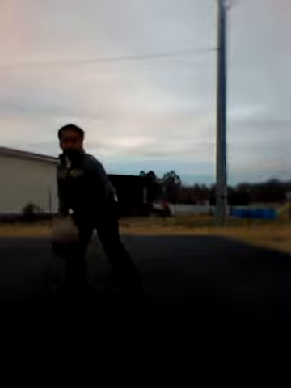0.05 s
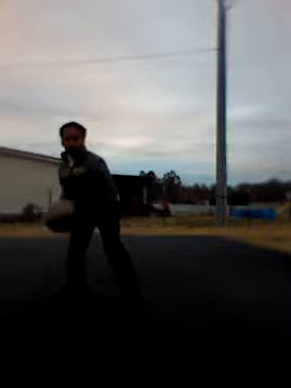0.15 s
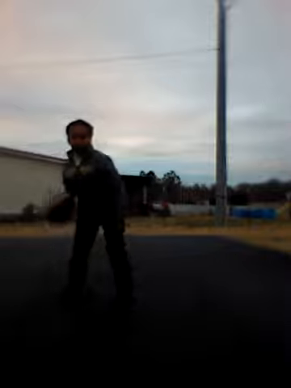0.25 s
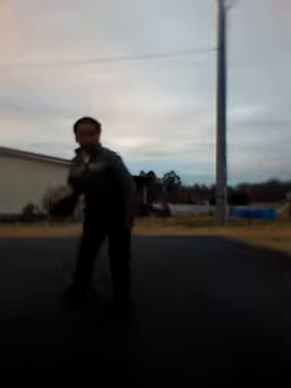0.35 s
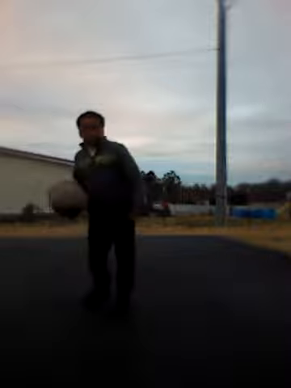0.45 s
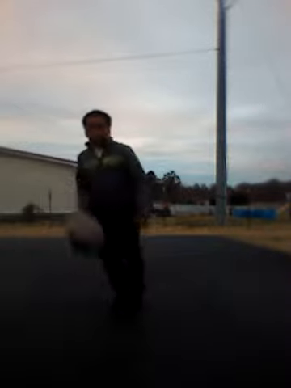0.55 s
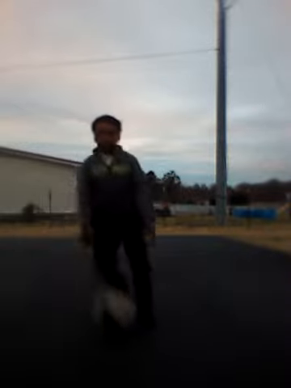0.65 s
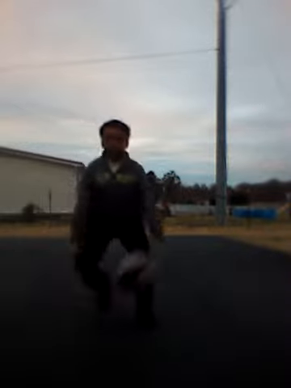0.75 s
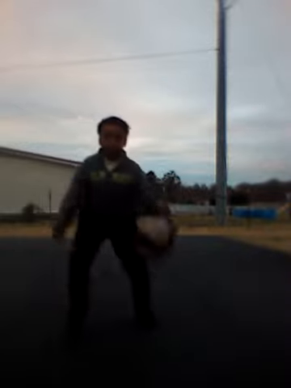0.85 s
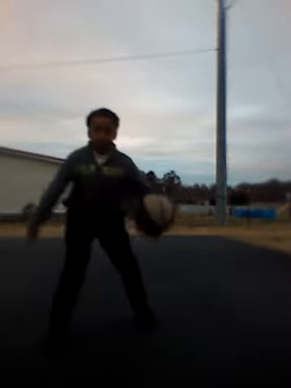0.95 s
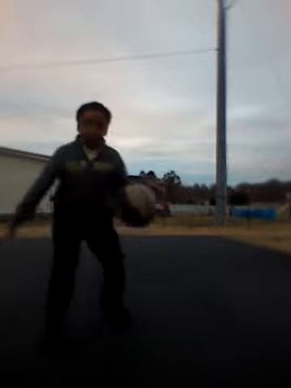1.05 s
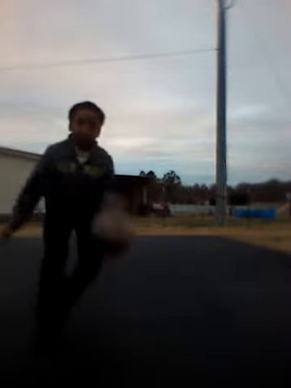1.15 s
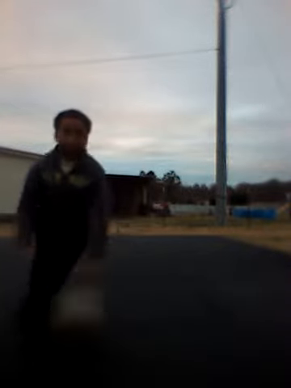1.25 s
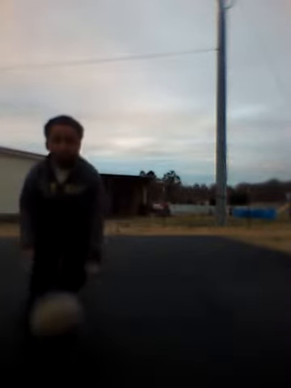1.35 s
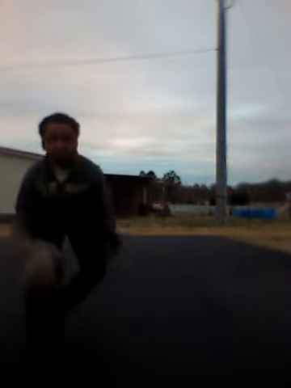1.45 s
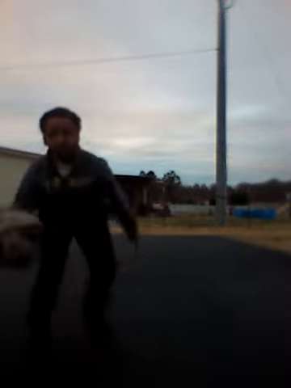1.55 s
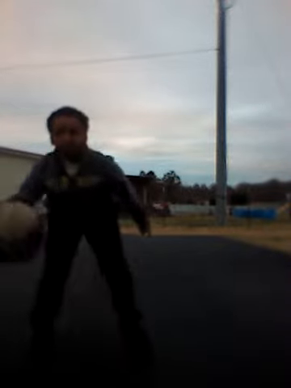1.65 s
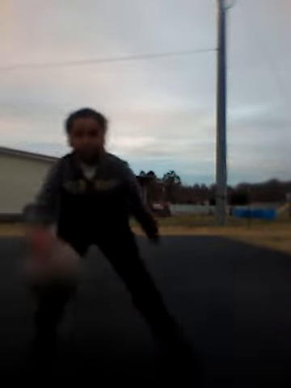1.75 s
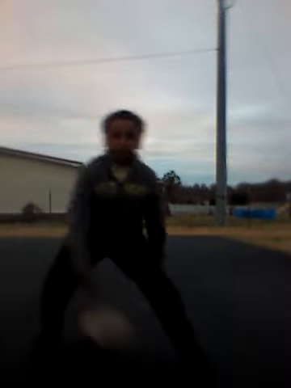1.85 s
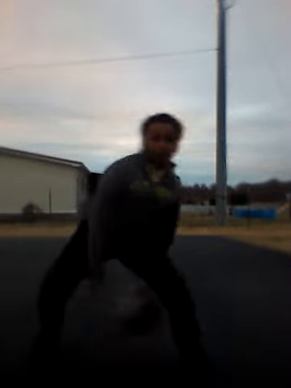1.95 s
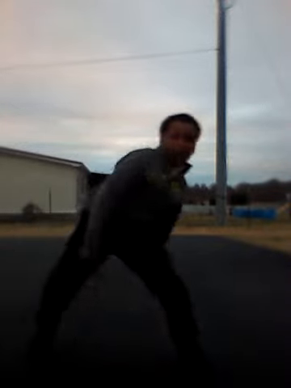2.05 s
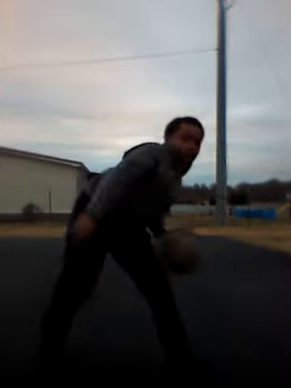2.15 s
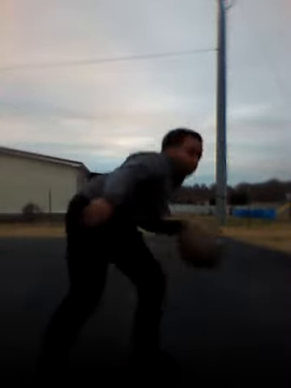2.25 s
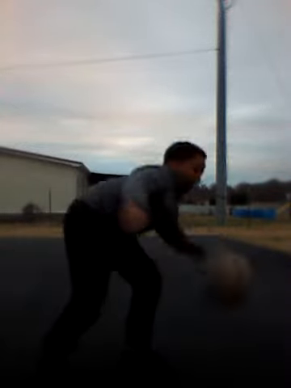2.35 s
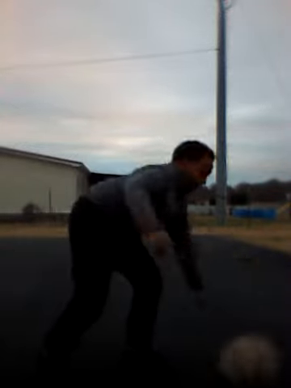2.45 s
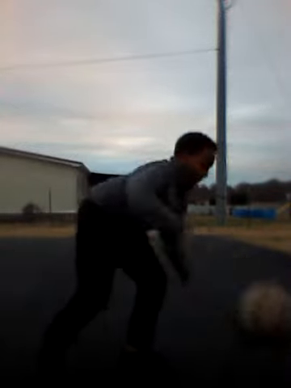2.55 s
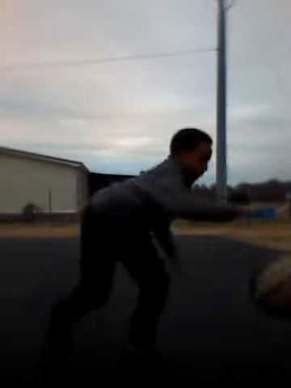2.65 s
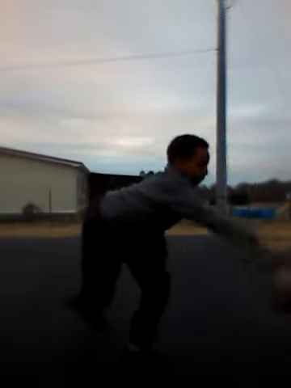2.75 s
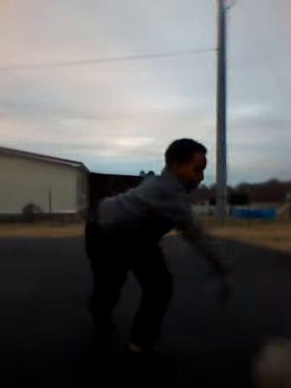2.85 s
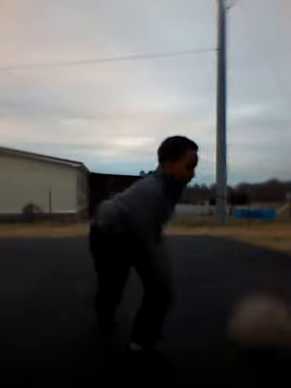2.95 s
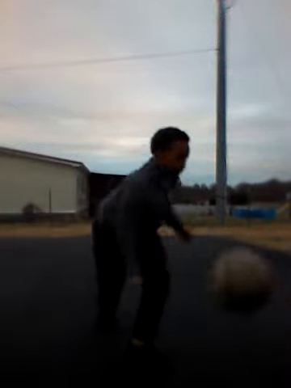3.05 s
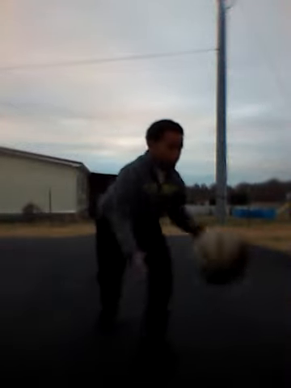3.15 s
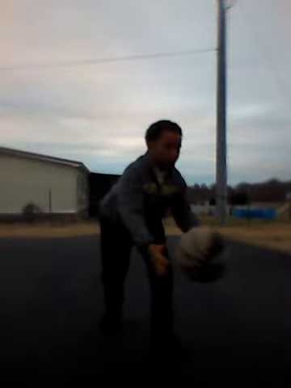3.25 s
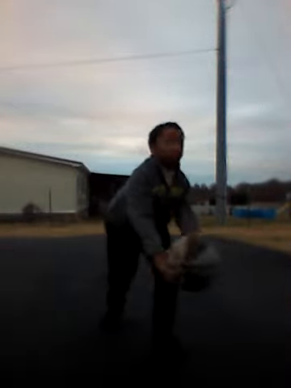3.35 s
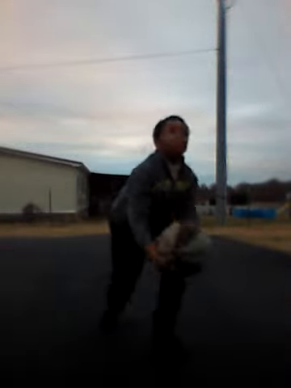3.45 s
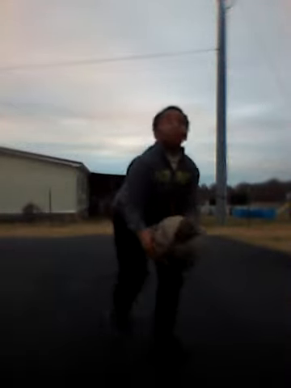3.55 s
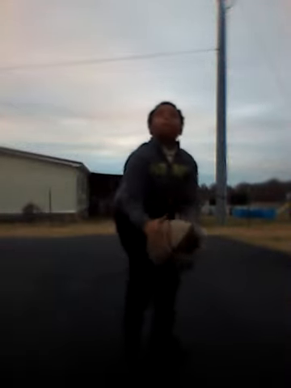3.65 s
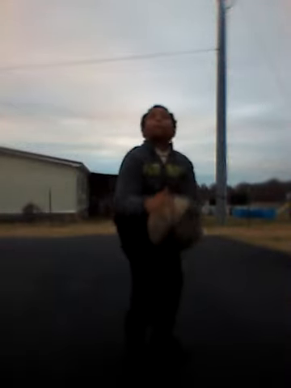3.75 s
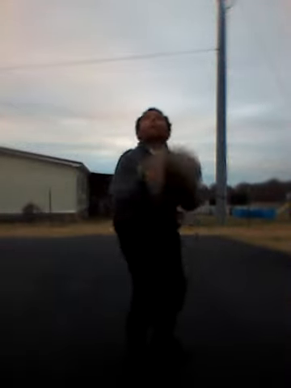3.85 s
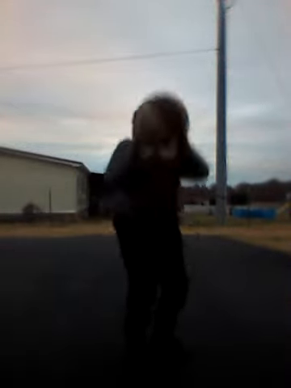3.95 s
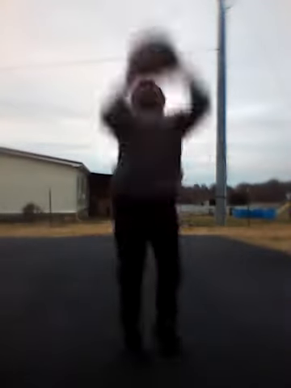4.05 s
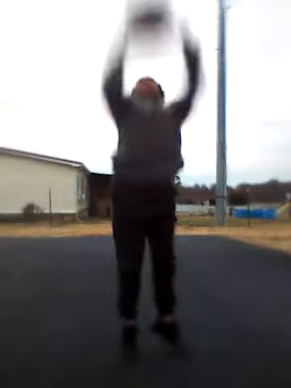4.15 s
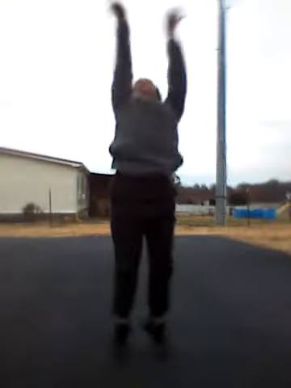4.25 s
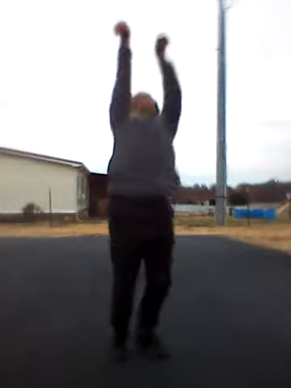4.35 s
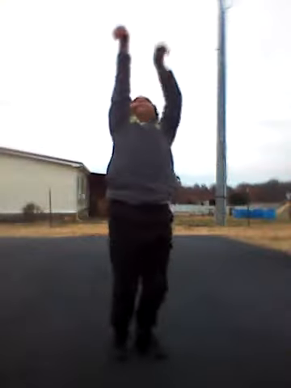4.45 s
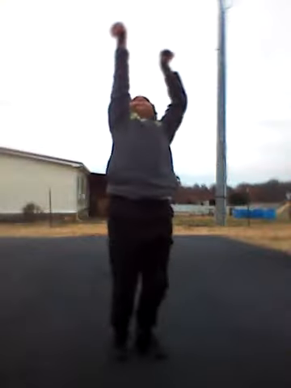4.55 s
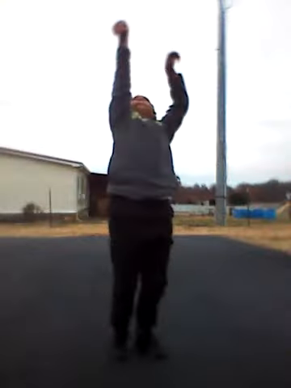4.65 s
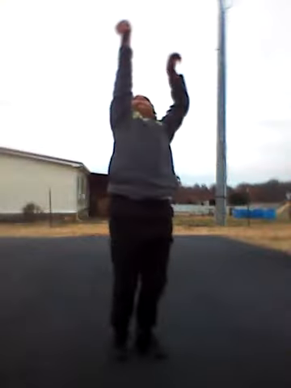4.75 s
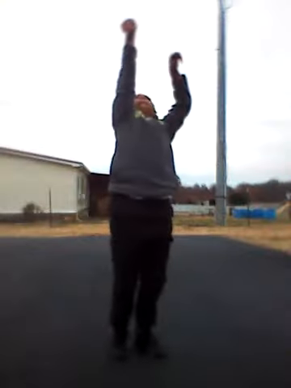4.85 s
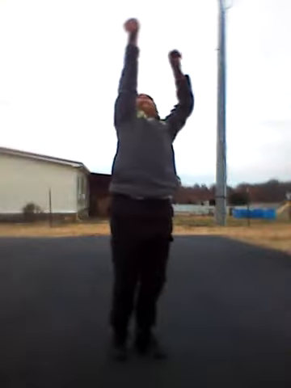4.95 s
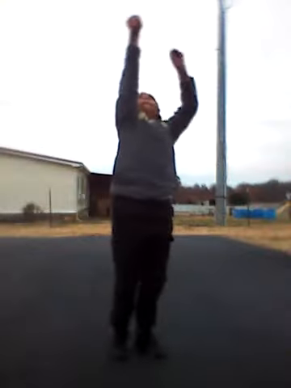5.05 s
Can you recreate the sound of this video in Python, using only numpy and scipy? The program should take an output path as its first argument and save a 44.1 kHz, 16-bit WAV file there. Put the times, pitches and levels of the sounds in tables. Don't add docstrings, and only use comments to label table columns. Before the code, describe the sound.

Close to the camera, a basketball strikes asphalt five times between about 0.7 and 2.9 seconds, each a sharp crack with a deep thump, short rubbery ring and wall slap. Palms tap and soles scuff gritty ground between bounces. Then only small taps and scuffs, and a jacket swish near 4.5 seconds. Distant traffic and a machine hum are pumped by automatic gain, dipping at bounces and swelling back, in an unnaturally wide stereo image.

```python
import sys
import numpy as np
from scipy import signal
from scipy.fft import rfft, irfft, next_fast_len
from scipy.io import wavfile
from scipy.ndimage import map_coordinates

SR = 44100
rng = np.random.default_rng(int(sys.argv[2]) if len(sys.argv) > 2 else 0)


def volts_from_db(level):
    exponent = np.asarray(level, float) / 20
    return 10 ** exponent


def file_out(sig):
    cols = np.atleast_2d(sig).T
    lim = np.clip(cols, -1, 1)
    pcm = np.round(lim * 32767).astype(np.int16)
    wavfile.write(sys.argv[1], SR, pcm)


N = 225029

# time [s], level [dB].
MACHINE_LOAD = [(0, 2), (.42, 9.5), (.62, 8), (1.0, 2), (1.6, -2.5), (1.95, 6.5), (2.4, 12), (2.85, -5),
                (3.3, 13), (3.55, 4), (3.7, -11), (3.95, 7.5), (4.25, 3.5), (4.4, 8), (4.55, -1),
                (4.75, 10.5), (5.1, 1)]
# frequency [Hz], phase wander [rad], level [dB].
HUM_ORDERS = [(61.2, 0.2, 8), (92, 2.1, -7.5), (140.5, 0.92, -5.5), (197, 0.92, -11.5)]
# time [s], level [dB].
WHINE_RISE = [(4.55, -80), (4.85, -62), (5.1, -55)]
# frequency [Hz], density [dB per Hz].
RUMBLE_SPECTRUM = [(12, -65), (20, -33), (49, 1.5), (81, -4.5), (108, 1), (211, -11), (240, -9.5),
                   (381, -20.5), (604, -24), (698, -29), (900, -39), (1170, -54), (1980, -120)]
# frequency [Hz], density [dB per Hz].
ROAD_SPECTRUM = [(300, -7), (600, -4), (900, 0), (1250, 0), (1600, -10), (2300, -12), (2750, -14),
                 (3300, -9.5), (4300, -21.5), (6000, -31), (9000, -34)]
# centre [Hz], width [Hz], level [dB].
ROAD_BANDS = [(622, 29, 6.5), (2666, 14, -4.5)]
# frequency [Hz], density [dB per Hz].
HISS_SPECTRUM = [(2000, -7), (5000, 9.5), (7500, 4), (10000, 15.5), (14500, -65), (15600, -3)]
# time [s], drop [dB].
GAIN_DROPS = [
    (.69, 6),
    (1.31, 7),
    (1.9, 0),
    (2.48, 11.5),
    (2.9, 3),
]
# start [s], attack [s], hold [s], level [dB], fizz brightness [dB].
SCUFF_EVENTS = [(0.53, 0.0069, 0.011, -46.5, -10.5), (0.618, 0.0068, 0.0057, -34, -19),
                (1.167, 0.021, 0.025, -38, -20.5), (1.214, 0.0043, 0.022, -61, -13),
                (1.731, 0.0045, 0.057, -52.5, -12), (2.036, 0.019, 0.00245, -46.5, -30),
                (2.189, 0.0024, .012, -23.5, -25), (2.21, 0.0048, 0.0178, -40, -22),
                (2.23, 0.012, 0.017, -25.5, -31.5), (2.266, 0.0074, 0.025, -32.5, -21.5),
                (2.31, 0.0242, 0.069, -53, -15), (3.042, 0.0075, 0.065, -56.5, -12.5),
                (3.27, 0.035, 0.0047, -42.5, -19.5), (3.556, 0.039, 0.048, -51.5, -11.5),
                (3.98, 0.0082, 0.041, -53, -15), (4.22, 0.025, .02, -55.5, -2)]
# frequency [Hz], density [dB per Hz].
SCUFF_BODY = [(200, 0), (500, -8), (760, -8), (1100, 9.5), (1500, 3), (2300, -6.5), (3000, -25),
              (5000, -52)]
# frequency [Hz], density [dB per Hz].
SCUFF_FIZZ = [(1500, -29), (3000, 3.5), (4300, -11), (6000, -19), (8500, -14), (15000, -36)]
# start [s], peak level [dB],
# ring [Hz], click level [dB], thud level [dB].
TAP_EVENTS = [(0.5305, -31.5, 1010, -17, 12), (0.5749, -37, 1040, -12, 8), (0.6227, -20.5, 1025, -13, -3.5),
              (0.809, -39, 1230, -2, 2), (0.9421, -36, 1030, -17, 5), (1.191, -30, 1980, -11, -8),
              (1.752, -40, 1180, 3, -8), (1.7793, -39, 1130, -21, -3), (1.8119, -36, 1150, -12, 6),
              (1.8964, -4, 1144, -29, -8.5), (2.029, -28.5, 1230, -22, -4), (2.038, -38, 1220, -17, 6),
              (2.0546, -28, 1390, -27, 2), (2.1961, -9.5, 1123, -41, -16), (2.3022, -31.5, 1080, -11, 11.5),
              (2.437, -27, 1190, -7, -11.5), (2.7692, -21.5, 1227, -14, 4.5), (2.977, -33, 1154, -15, -12),
              (3.0993, -51.5, 1140, -16, 17), (3.2581, -38.5, 2020, -8, 7.5), (3.408, -40, 1447, -5.5, -2),
              (3.727, -25, 1130, -36, -0.5), (4.2691, -22, 1223, -12, -10), (4.3071, -22, 1175, -24, -8)]
# start [s], blow level [dB], crack level [dB], shell ring [Hz], wall slap level [dB].
BOUNCE_EVENTS = [
    (0.6776, -0.5, -2, 1216, -8.5),
    (1.3, 0.5, -5, 1200, -12),
    (1.8920, -5, -10.5, 1070, -7.5),
    (1.9015, -6, -58, 1035, -13.5),
    (2.4717, 0.5, -4.5, 1250, -21.5),
    (2.8959, -1.5, -2, 1340, -14.5),
]
# frequency [Hz], level [dB], time to fall 60 dB [s].
RUBBER_MODES = [(239, -22, 0.095), (397, -11.5, 0.018), (577.4, -8.5, 0.017), (1846, -12, 0.017),
                (3100, -50, .015), (4770, -25, 0.0085)]
# frequency [Hz], level [dB], time to fall 60 dB [s].
AIR_MODES = [(980, -50, .4), (1416, -70, .25), (2140, -55, .4), (2680, -66, .4), (2815, -66, .4),
             (3465, -54, .45), (3950, -74, .5), (4400, -73, 1.2), (5700, -80, .4)]
# frequency [Hz], time to fall 60 dB [s].
YARD_DECAY = [(150, 0.22), (1200, 0.089), (4000, 0.16), (10000, 0.15)]
# centre [s], length [s], level [dB].
SWISH_EVENTS = [
    (3.04, 0.08, -64),
    (4.015, 0.038, -53),
    (4.237, 0.19, -56.5),
    (4.368, 0.13, -56.5),
    (4.547, 0.15, -44),
]
# centre [Hz], width [Hz], level [dB].
NYLON_BANDS = [(1490, 1200, 2.5), (2580, 370, 10.5), (3700, 350, -1.5), (6470, 450, -12), (7380, 720, -8)]
# frequency [Hz], phase [rad].
PORT_PHASE = [(60, -.12), (300, -.17), (700, -.36), (1450, -3.1), (3220, 0), (4750, -3.1), (6400, 0),
              (7900, -3.1), (9400, -6.1), (10600, -8.5), (12100, -9.4), (13950, -6.28), (15400, -3.1)]
# frequency [Hz], left minus right [dB].
PORT_BALANCE = [(100, .9), (700, .5), (1200, 4.5), (1600, -.5), (2500, -1), (3150, 0), (4200, 1), (5500, 1),
                (6350, 0), (11500, 1), (13900, 0)]


def unit(x):
    return x / np.sqrt(np.mean(x ** 2) + 1e-20)


def along(points, hz):
    f, v = np.transpose(points)
    return np.interp(np.log(hz + 1), np.log(f + 1), v)


def over_time(rows):
    return np.interp(np.arange(N) / SR, *np.transpose(rows))


def filtered(x, response):
    m = next_fast_len(x.shape[-1] + 8192)
    spectrum = rfft(x, m) * response(np.fft.rfftfreq(m, 1 / SR))
    return irfft(spectrum, m)[..., :x.shape[-1]]


def resonance(f, hz, width_hz):
    return 1j * f * width_hz / (hz * hz - f * f + 1j * f * width_hz)


def wobble(rate):
    knots = rng.standard_normal(int(N * rate / SR) + 4)
    return map_coordinates(knots, [np.arange(N) * rate / SR])


def diffuse(response, alike):
    a, b = rng.standard_normal((2, N))
    pair = np.array([a, alike * a + np.sqrt(1 - alike ** 2) * b])
    return unit(filtered(pair, response))


def ring(t, hz, db, t60, phase=0):
    return volts_from_db(db - 60 * t / t60) * np.sin(2 * np.pi * hz * t + phase)


def late(x, seconds):
    return np.pad(x, (round(seconds * SR), 0))[:len(x)]


def add(track, s, sound):
    part = track[..., round(s * SR):][..., :sound.shape[-1]]
    part += sound[..., :part.shape[-1]]


def yard(x):
    hz, t, z = signal.stft(rng.standard_normal((2, len(x))), SR, nperseg=128)
    decay = volts_from_db(-60 * t / along(YARD_DECAY, hz)[:, None])
    tail = signal.istft(z * decay, SR, nperseg=128)[1]
    tail = tail / np.linalg.norm(tail[0])
    return signal.fftconvolve(x[None], tail, axes=1)[:, :len(x)]


def gain_db():
    t = np.arange(N) / SR
    climb_db_per_s, drop_s = 8.5, 0.029
    drops = sum(db * np.clip((t - s) / drop_s, 0, 1) for s, db in GAIN_DROPS)
    return climb_db_per_s * t - drops


def machine_hum():
    t = np.arange(N) / SR
    orders = 0
    for hz, wander, db in HUM_ORDERS:
        level = volts_from_db(db - HUM_ORDERS[0][2] + 4.0 * wobble(7))
        orders = orders + level * np.sin(2 * np.pi * hz * t + wander * wobble(6))
    return volts_from_db(-43.5 + over_time(MACHINE_LOAD)) * orders


def road_wash():
    def response(f):
        bands = sum(volts_from_db(db) * abs(resonance(f, hz, width)) for hz, width, db in ROAD_BANDS)
        return volts_from_db(along(ROAD_SPECTRUM, f)) + bands
    return diffuse(response, alike=0.2) * volts_from_db(0.85 * wobble(14))


def background():
    gain, t = gain_db(), np.arange(N) / SR
    rumble = diffuse(lambda f: volts_from_db(along(RUMBLE_SPECTRUM, f)), alike=0.77)
    rumble = rumble * volts_from_db(-36.5 + 0.47 * wobble(11))
    hiss = diffuse(lambda f: volts_from_db(along(HISS_SPECTRUM, f)), alike=0.44)
    whine = volts_from_db(over_time(WHINE_RISE)) * np.sin(2 * np.pi * 2756 * t + 0.8 * wobble(8.2))
    lows = volts_from_db(1.154 * gain) * (rumble + machine_hum())
    return lows + volts_from_db(-55.5 + gain) * road_wash() + volts_from_db(-74.5 + 0.7 * gain) * hiss + whine


def scuffs():
    grains = rng.standard_normal(N) * volts_from_db(2.9 * wobble(500) + 2.35 * wobble(90))
    pair = grains + 0.89 * rng.standard_normal((2, N))
    body = unit(filtered(pair, lambda f: volts_from_db(along(SCUFF_BODY, f))))
    fizz = unit(filtered(pair, lambda f: volts_from_db(along(SCUFF_FIZZ, f))))
    swell_db, release_db_per_s = 25, 800
    out, t = np.zeros((2, N)), np.arange(SR // 3) / SR
    for s, attack, hold, level_db, bright_db in SCUFF_EVENTS:
        swell = -swell_db * np.clip(1 - t / attack, 0, 1)
        release = -release_db_per_s * np.clip(t - attack - hold, 0, 1)
        span = slice(round(s * SR), round(s * SR) + len(t))
        grit = 0.89 * body[:, span] + volts_from_db(bright_db + 9.5) * fizz[:, span]
        add(out, s, volts_from_db(level_db + swell + release) * grit)
    return out


def taps():
    out, t = np.zeros((2, N)), np.arange(SR // 6) / SR
    puff_t60 = np.array([[0.008], [0.025], [0.035]])
    for s, db, hz, click_db, thud_db in TAP_EVENTS:
        puffs = rng.standard_normal((3, len(t))) * volts_from_db(-60 * t / puff_t60)
        click = volts_from_db(click_db + 0.5) * filtered(puffs[0], lambda f: resonance(f, 4400, 2100) ** 2)
        body = ring(t, hz, -5.2, 0.026)
        body = body + 1.1 * filtered(puffs[1], lambda f: resonance(f, hz, 670) ** 2)
        thud = ring(t, 183, thud_db + 5, 0.021)
        thud = thud + volts_from_db(thud_db + 8.5) * filtered(puffs[2], lambda f: resonance(f, 446, 610) ** 2)
        tap = click + body + thud
        tap = tap + 0.11 * late(tap, 0.0062)
        add(out, s, volts_from_db(db) * (tap + volts_from_db(-5.5) * yard(tap)))
    return out


def ball_air(t):
    air = 0
    for hz, db, t60 in AIR_MODES:
        tone = ring(t, hz, db + 2.5 + rng.normal(0, 2), t60, rng.uniform(0, 2 * np.pi))
        beat = 1 + 0.5 * np.cos(rng.uniform(5, 25) * t + rng.uniform(0, 2 * np.pi))
        air = air + tone * beat
    return air


def wall_slap(t, push, shell, blow, slap_db):
    smear = rng.standard_normal(len(t)) * volts_from_db(-60 * t / 0.015) * (1 - np.exp(-t / 0.002))
    bright = signal.fftconvolve(push + 0.21 * shell, smear / np.linalg.norm(smear))[:len(t)]
    back = 2.17 * filtered(bright, lambda f: resonance(f, 1126, 340) + 0.26 * resonance(f, 2770, 2500) ** 2)
    back = back - 0.41 * filtered(blow, lambda f: resonance(f, 340, 810))
    return volts_from_db(slap_db + 12.5) * late(back, 0.0148)


def ball():
    out, t = np.zeros((2, N)), np.arange(SR // 3) / SR
    for s, blow_db, crack_db, shell_hz, slap_db in BOUNCE_EVENTS:
        push = 1.8 * (1 - t / 0.0007) * np.exp(-t / 0.0007) * (1 - np.exp(-t / 0.00015))
        grit = volts_from_db(-9 - 60 * t / 0.024) * rng.standard_normal(len(t))
        grit = filtered(grit, lambda f: resonance(f, 2200, 3500) ** 3)
        thump = ring(t, 136.4, 1, 0.029, phase=2.36) * (1 - np.exp(-t / 0.00033))
        thump = thump + ring(t, 47, -4.5, 0.076)
        rubber = sum(ring(t, hz * rng.normal(1, 0.019), db + rng.normal(0, 0.24), t60)
                     for hz, db, t60 in RUBBER_MODES)
        shell = ring(t, shell_hz, -8 + 0.13 * crack_db, 0.019)
        blow = volts_from_db(crack_db) * (push + grit + rubber) + thump + shell
        air = ball_air(t)
        direct = blow + wall_slap(t, push, shell, blow, slap_db)
        aside = volts_from_db(crack_db - 16 - 60 * t / 0.036) * rng.standard_normal((2, len(t)))
        aside = filtered(aside, lambda f: resonance(f, 4020, 2300) ** 2)
        scatter = yard(filtered(direct, lambda f: resonance(f, 840, 4400)))
        near = filtered(direct + aside, lambda f: 1 / (1 + 1j * f / 7000))
        add(out, s, volts_from_db(blow_db) * (near + air + volts_from_db(-9.5) * scatter))
    return out


def jacket():
    t = np.arange(N) / SR
    cloth = diffuse(lambda f: sum(volts_from_db(db) * resonance(f, hz, width) ** 2 for hz, width, db in NYLON_BANDS),
                    alike=0.29)
    cloth = cloth * volts_from_db(1.2 * wobble(60))
    return cloth * sum(volts_from_db(db) * np.exp(-(2 * (t - s) / length) ** 4) for s, length, db in SWISH_EVENTS)


def scene():
    return background() + scuffs() + taps() + ball() + jacket()


def band_limit(x):
    return signal.sosfilt(signal.butter(12, 15960, fs=SR, output="sos"), x)


def record(dry):
    def widening(f):
        half = np.interp(f, *np.transpose(PORT_PHASE)) / 2
        return np.exp(1j * half) * [np.cos(half), -1j * np.sin(half)]

    def balance(f):
        return volts_from_db(np.outer([0.5, -0.5], along(PORT_BALANCE, f))) * (f < 15900)

    longer = np.hstack([dry, dry[:, :-2000:-1]])
    side, mid = filtered(longer, widening)
    pair = filtered(np.array([mid + side, mid - side]), balance)
    return band_limit(np.clip(pair[:, :N], -1, 1))


dry = scene()
out = record(dry)
file_out(out)
```